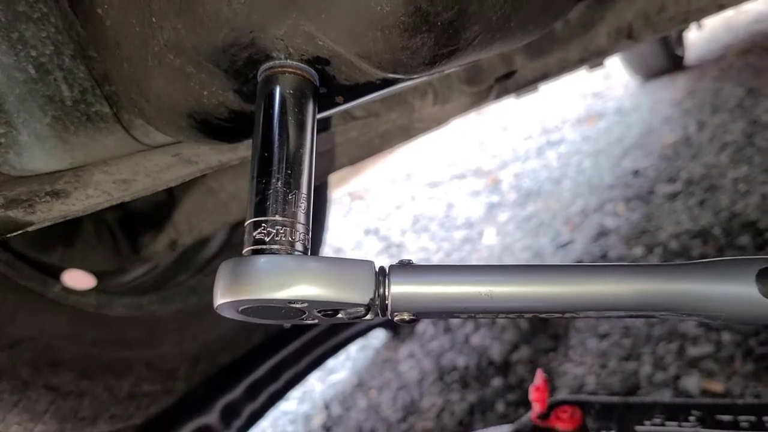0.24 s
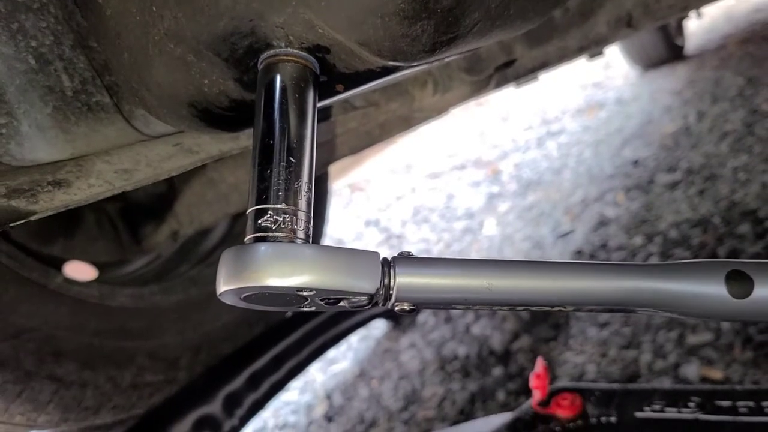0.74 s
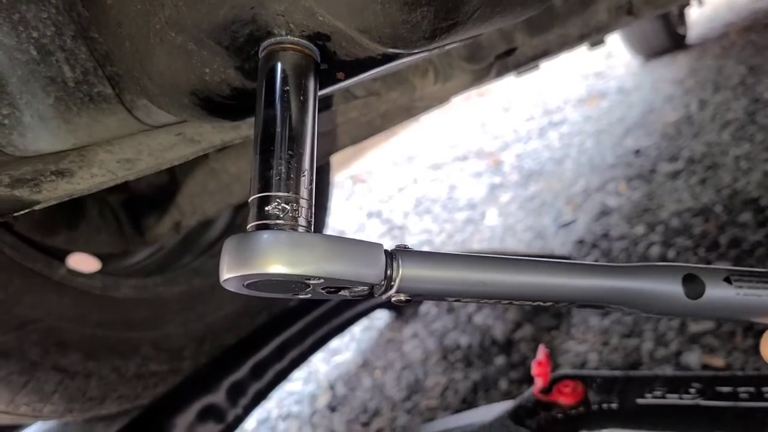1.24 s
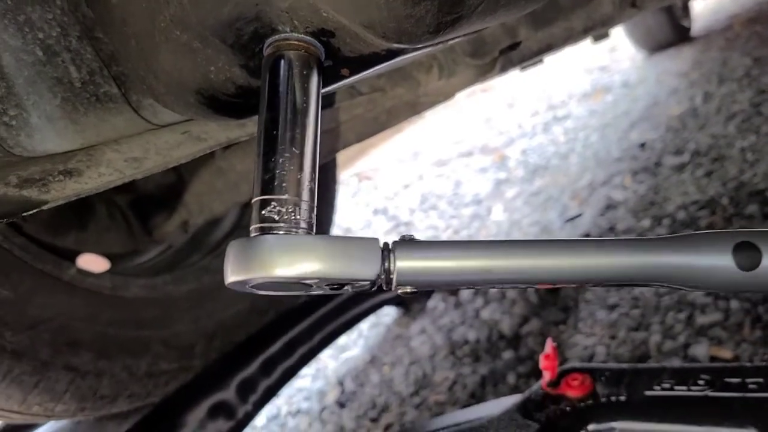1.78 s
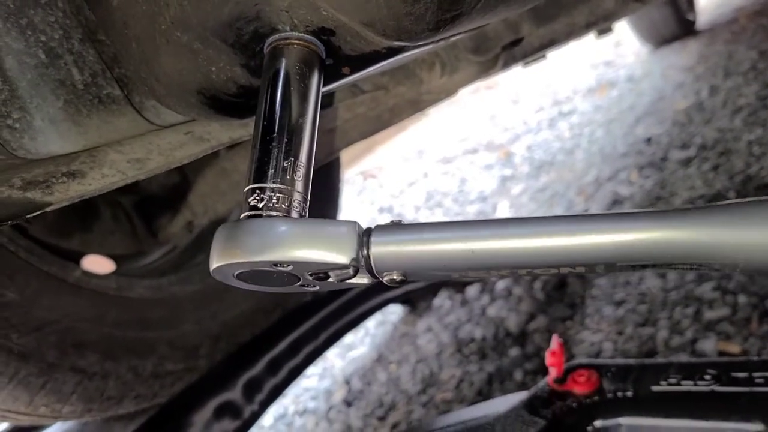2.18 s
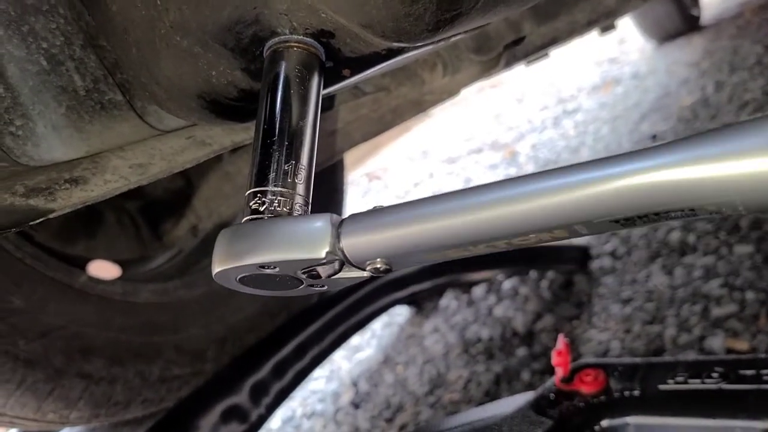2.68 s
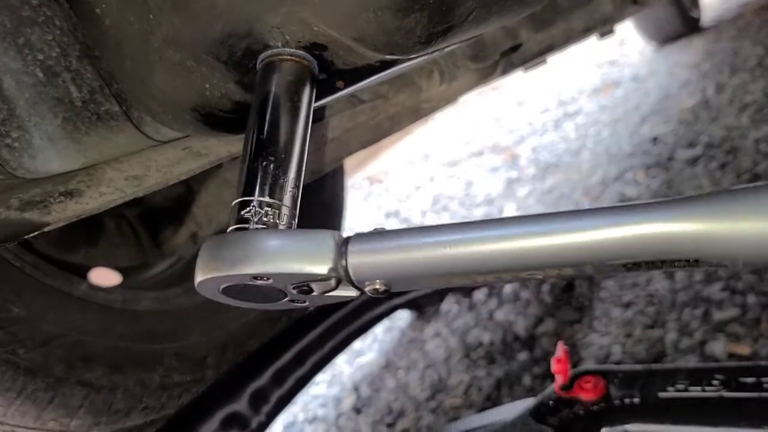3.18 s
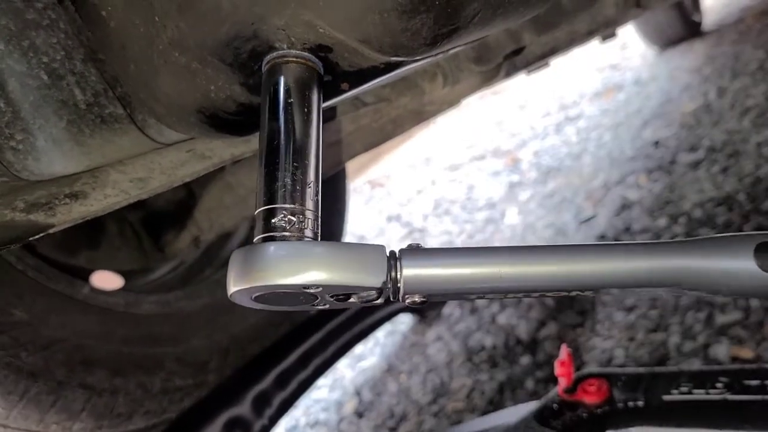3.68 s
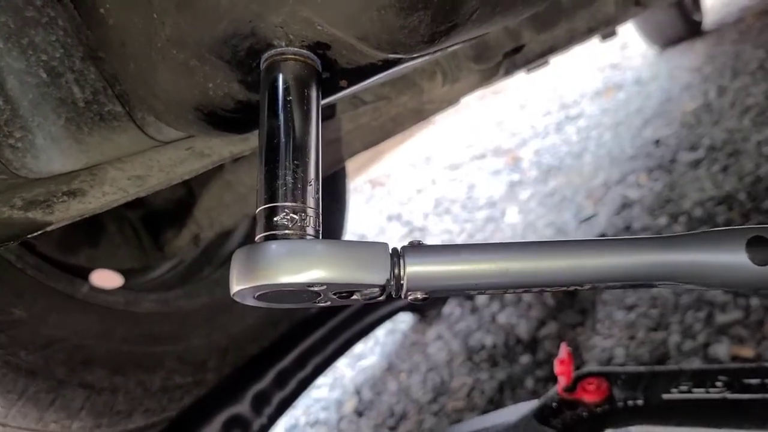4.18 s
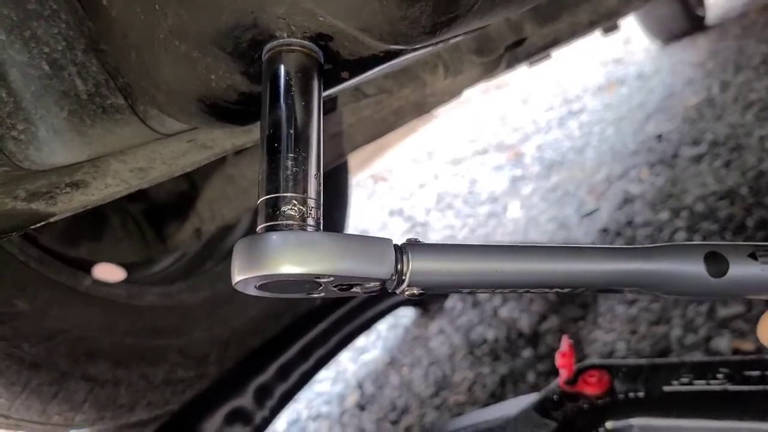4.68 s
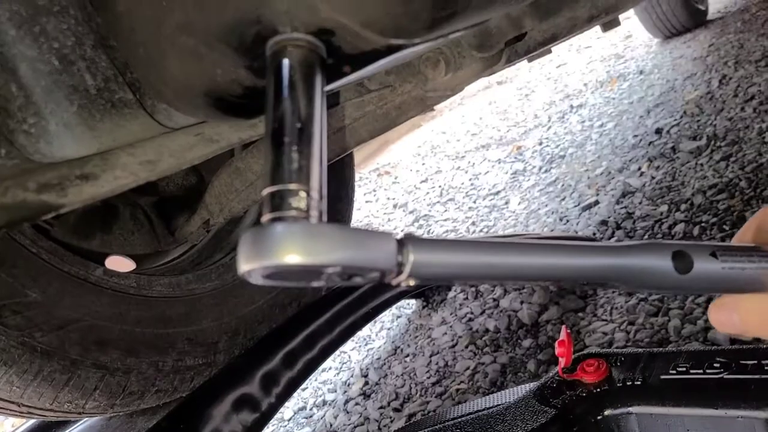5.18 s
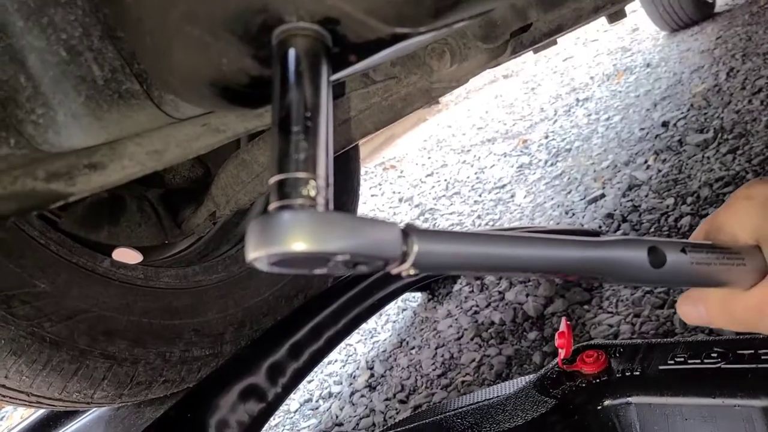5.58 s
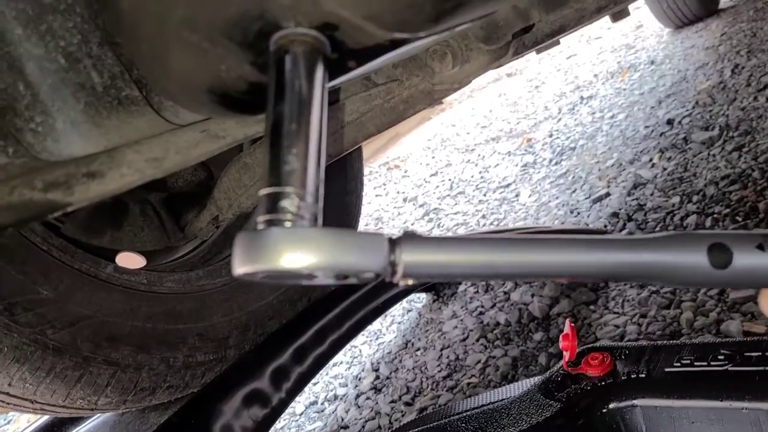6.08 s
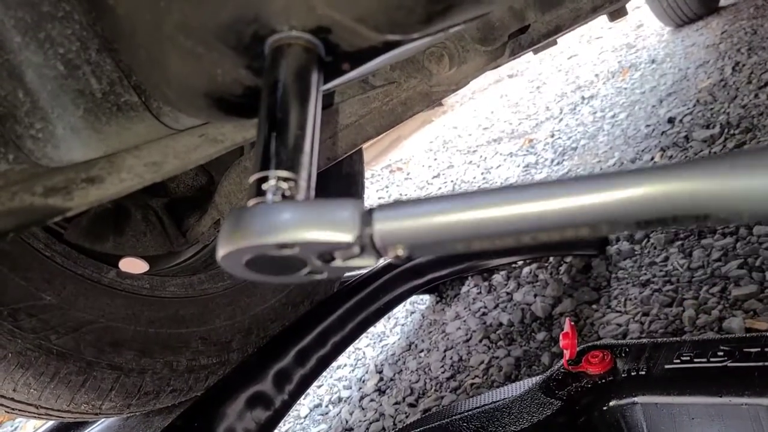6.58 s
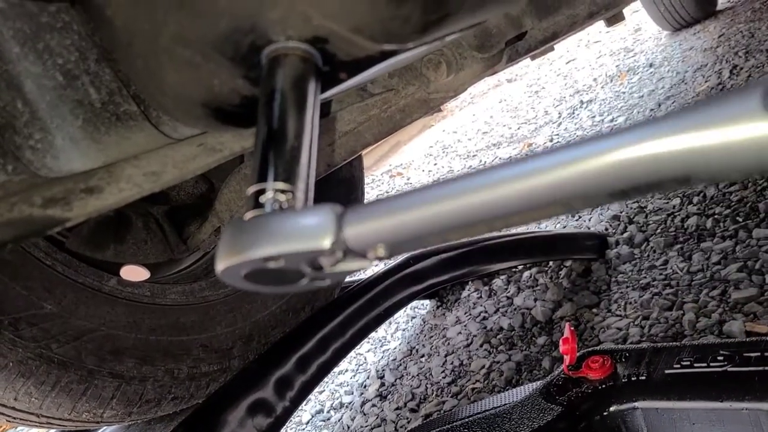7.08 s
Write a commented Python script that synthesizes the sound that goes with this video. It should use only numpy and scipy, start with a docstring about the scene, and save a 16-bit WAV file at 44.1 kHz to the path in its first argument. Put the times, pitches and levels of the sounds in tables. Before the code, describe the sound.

Under a car on gravel, closely miked in stereo, faint distant rumble and thin hiss run throughout with soft low wind puffs. From 0.1 to 0.6 s a mat gives small creaks at left; a sleeve swishes at right from about 0.6 to 1.3 s. Socket knocks, short and hollow with pan ring, come at 1.5 and 1.85 s amid more cloth. At 2.5 s the torque wrench cracks, by far the loudest event: a bright metallic snap with a tiny precursor and short ring. Faint knocks and ticks follow to 3.4 s. From 3.9 to 6.1 s sleeve rustle, mat creaks, rubbing and grit overlap, with a heavier drag near 5.4 s. A dull knock lands at 6.17 s, cloth fades, and a second, slightly softer snap strikes at 6.65 s. Weak clunks end around 7.3 s.

```python
"""Under a car on gravel a click-type torque wrench tightens a drain plug. It snaps twice at its set torque:
bursts of band-split noise crack while struck modes ring the tube and the oil pan. The socket knocks on the plug
and rings the pan. A sleeve swishes on the right and the mat creaks on the left, both friction noise. Noise bursts
through resonances give ticking grit and wind puffs; shaped noise gives distant rumble and faint outdoor hiss."""
import sys
import numpy as np
from scipy import signal
from scipy.fft import rfft, irfft, next_fast_len
from scipy.io import wavfile

SR = 44100
rng = np.random.default_rng(int(sys.argv[2]) if len(sys.argv) > 2 else 0)


def file_out(sig):
    """Save sig as 16-bit WAV at sys.argv[1]."""
    # one column per channel
    cols = np.atleast_2d(sig).T
    # limit, then scale
    lim = np.clip(cols, -1, 1)
    pcm = np.round(lim * 32767).astype(np.int16)
    wavfile.write(sys.argv[1], SR, pcm)


N = 323694
PORT_LAG = 21   # samples between the microphone ports for a source at the side


# Wrench pawl slipping and striking. Each row: start in seconds, crack level in dB, rise of the crack and decay
# of the blow in ms, blow into the pan over crack in dB, grip damping factor, tube ring over crack in dB.
PAWL_SNAPS = [(2.4800, -19, 1.8, -20, 2.5, -14), (2.5008, 0, 1.2, -23, 3.5, -9),
              (6.6303, -21, .6, -14, 1.2, -16), (6.6534, -14, 1.2, -24, 1.3, -20),
              (6.6562, -3, .9, -18, 1, -16)]
# Modes of wrench tube and socket. Each row: frequency in Hz, level in dB, t60 in seconds before the grip damps it.
WRENCH_MODES = [(1930, -14, .06), (2126, -20, .08), (3070, -18, .07), (4565, -12, .06), (4996, -12, .07),
                (5992, -16, .07), (8403, -22, .04), (9819, -16, .035), (10760, -17, .035),
                (12300, -16, .04), (14809, -26, .06), (2562, -32, .2), (2632, -32, .55), (3854, -23, .17),
                (4716, -19, .17), (5120, -25, .2), (5330, -26, .15), (5685, -18, .24), (5857, -27, .24)]
# Spectrum of the crack. Each row: frequency in Hz, level in dB per Hz.
CRACK_TONE = [(710, -35), (1200, -23.5), (1950, -5), (2400, -7.5), (4860, 3), (6800, 2), (7490, -7),
              (9110, -6.5), (12100, 7.5), (15500, 11), (16000, -14)]
LET_OFF_S, LET_OFF_T60_S = .16, .12   # this long after a snap the pull eases and the slack joint chokes the ring


def wrench():
    """Impulse excitation: each snap cracks, rings the tube and drives the pan; grip damps all but one long mode."""
    out = np.zeros((2, N))
    t = np.arange(20000) / SR
    choke = from_db(-60 * np.maximum(t - LET_OFF_S, 0) / LET_OFF_T60_S)
    for s, db, ms, pan_db, grip, ring_db in PAWL_SNAPS:
        # the socket's long ring escapes the grip
        held = [(hz, level_db, t60 / max(grip, .5) if t60 < .3 else t60)
                for hz, level_db, t60 in WRENCH_MODES]
        add(out, s, from_db(db) * crack(CRACK_TONE, ms, head_db=20.0, head_speed=6.1))

        tube_blow = contact(ms, 0.037, size=20000)
        tube = choke * struck(held, tube_blow, scatter_db=3.2)
        add(out, s, from_db(db + ring_db) * tube)

        pan_blow = contact(6, 2, size=12000)
        pan = struck(loaded_pan(0, load=.35), pan_blow, scatter_db=2)
        add(out, s, from_db(db + pan_db) * peak_one(pan))
    return out


# Socket knocking on the plug. Each row: start in seconds, peak of the first ring in dB, clunk over ring in dB,
# tilt of the ring in dB per octave.
SOCKET_KNOCKS = [(1.365, -50.5, -4, -16), (1.529, -26.5, -0.5, 7), (1.552, -30.5, -1.5, 6),
                 (1.847, -25, -3.5, 11), (1.877, -39, 0, 1), (2.879, -55.5, -2, 6.5), (3.278, -41, -3, -3),
                 (3.396, -44.5, 3, 3), (3.409, -48, 1, 4), (5.783, -38.5, -14, -5), (6.173, -28, 4.5, -10),
                 (6.239, -41, -17, 6), (6.577, -39.5, -14, 5.5), (6.949, -43.5, -11, -16),
                 (6.98, -50, -15, 8), (7.067, -35, 8, -14), (7.074, -36.5, -5, 22), (7.237, -53, -1.5, 2.5),
                 (7.289, -36.5, -8, -2)]
# Dense upper pan modes. Each row: frequency in Hz, level in dB per Hz.
CLUNK_TONE = [(350, -24), (600, -3), (1000, 16.5), (1500, -2.5), (2200, -18.5), (3000, 7.5), (4200, -16),
              (5200, -11), (8000, -55)]
KNOCK_MS = 4.0                       # decay of the contact chatter
REBOUND_S, REBOUND_DB = .011, -8.5   # spacing is near this; each rebound is weaker by this much


def socket():
    """Repeated impact: a knock and two uneven rebounds ring the low pan modes, with clunk from the dense upper ones."""
    out = np.zeros((2, N))
    for s, db, clunk_db, tilt_db in SOCKET_KNOCKS:
        for k in range(3):
            hit_s = s + k * REBOUND_S * rng.uniform(0.76, 1.2)
            hit_db = db + k * REBOUND_DB
            # soft, oily contact
            push = signal.lfilter([.2], [1, -.8], contact(KNOCK_MS, 1.1, size=12000))
            pan = struck(loaded_pan(tilt_db), push, scatter_db=2.5)
            add(out, hit_s, from_db(hit_db) * peak_one(pan))
            clunk = crack(CLUNK_TONE, KNOCK_MS / 2.3, head_db=23.0, head_speed=3.3)
            add(out, hit_s, from_db(hit_db + clunk_db) * clunk)
    return out


# Oil pan modes. Each row: frequency in Hz, level in dB before tilt, t60 in seconds with no socket on the plug.
PAN_MODES = [(586, -10, 0.47), (619, -13, 0.18), (700, -25, 0.17), (817, -5, 0.24), (896.6, -21.5, 0.1),
             (988, -1.5, 0.12), (1061.5, -2.5, 0.24), (1117, -3, 0.079), (1255, -6.5, 0.3),
             (1280, -23.5, 0.012), (1896, -3, 0.011)]


def loaded_pan(tilt_db, load=.6):
    """Modal damping: the pressed socket shortens the ring by the load; where the blow lands tilts the modes."""
    return [(hz, db + tilt_db * np.log2(hz / 900), load * t60) for hz, db, t60 in PAN_MODES]


# Decay of the crack by band. Each row: frequency in Hz, t60 in seconds.
CRACK_DECAY = [(500, 0.06), (1200, 0.19), (3500, 0.086), (9000, 0.076), (16000, 0.041)]
# Balance of the crack. Each row: frequency in Hz, left over right in dB.
CRACK_BALANCE = [(1000, 5.5), (2200, 2.5), (4500, 4.5), (8000, -7), (12000, -3)]


def crack(tone, rise_ms, head_db, head_speed, size=7000):
    """Diffuse decay: dense modes and echoes off floor pan and gravel as noise bands under a quick first fall."""
    edges, t = 400 * 2 ** np.arange(0, 5.4, 1 / 3), np.arange(size) / SR   # third octaves
    rise = (1 - np.exp(-1000 * t / max(rise_ms, .02))) ** 2
    out = 0
    for low, high in zip(edges, edges[1:]):
        hz = np.sqrt(low * high)
        fall = from_db(-60 * t / at_hz(CRACK_DECAY, hz))
        envelope = rise * (fall + from_db(head_db) * fall ** head_speed)
        noise = rng.standard_normal((2, size)) * envelope
        gain = from_db(at_hz(tone, hz) + at_hz(CRACK_BALANCE, hz) * np.array([[.5], [-.5]]))
        out = out + gain * bandpass(noise, low, high, order=2)
    return peak_one(out)


def struck(modes, push, scatter_db, turn=0.23):
    """Modal superposition: each port hears every mode at its own strength, one port a part of a cycle later."""
    out = 0
    gains = from_db(scatter_db * rng.standard_normal((len(modes), 2, 1)))
    for k, (hz, db, t60) in enumerate(modes):
        tone = from_db(db) * ring(push, hz, t60)
        late = np.r_[np.zeros(round(turn * SR / hz)), tone][:len(tone)]
        out = out + gains[k] * np.array([tone, late] if k % 2 else [late, tone])
    below_hz = .85 * min(modes)[0]      # a small body radiates little under its lowest mode
    return signal.sosfilt(signal.butter(4, below_hz, "high", fs=SR, output="sos"), out)


def contact(ms, chatter, size):
    """Impact force: a clean blow with chatter dying over about ms."""
    push = chatter * burst(ms, size=size)[0]
    push[0] += 1
    return push


# Sleeve strokes. Each row: start in seconds, rise in seconds, hold in seconds, fall in seconds,
# held hiss level in dB, body over hiss in dB.
SLEEVE_STROKES = [(0.547, .21, 0.54, 0.044, -52, 1.23), (1.463, 0.041, 0.097, 0.063, -57, 3),
                  (1.509, .16, 0.2, .12, -47, 0), (1.94, 0.061, .04, 0.13, -69, 2.66),
                  (2.99, 0.057, 0.2, 0.059, -65, 1.5), (3.33, 0.043, 0.27, .06, -72.5, 0.5),
                  (3.619, 0.046, 0.024, 0.11, -68.5, 2), (3.916, 0.32, 0.43, 0.15, -54.5, 2),
                  (4.703, 0.036, 0.018, 0.18, -59, 3.5), (4.835, 0.055, 0.26, 0.054, -61.5, 3.5),
                  (5.968, 0.12, .3, 0.35, -48.5, 1.34)]
# Spectrum of the cloth. Each row: frequency in Hz, level in dB per Hz.
CLOTH_TONE = [(200, -7.5), (330, 0), (460, -7.5), (720, 1), (1400, -3), (2000, -5), (2500, -6),
              (3300, -4.5), (4200, -7), (6400, 7), (7900, -20), (9500, -17.5), (12000, -17), (16000, -31.5)]
# Balance of the cloth. Each row: frequency in Hz, left over right in dB.
CLOTH_BALANCE = [(250, -1.5), (1300, -1), (2400, -3.5), (5000, -1.5), (9000, -10.5), (16000, -11.5)]


def sleeve():
    """Sliding friction: smooth cloth noise from the right in strokes; broad contact adds body below the hiss."""
    alike = [(250, 0.7), (1000, 0.29), (3000, 0.05), (8000, 0.054), (16000, 0.13)]
    grains = friction(1.5, 30000)
    rub = stereo_noise(grains, CLOTH_TONE, CLOTH_BALANCE, alike, PORT_LAG, patchy_db=1.8)
    hiss, body = part(rub, 7500, 18000), part(rub, 150, 7500)
    body = body + from_db(-22.0) * part(rub, 1900., 2150.)      # the weave sings faintly
    return sum(stroke(*shape) * (hiss + from_db(body_db) * body) for *shape, body_db in SLEEVE_STROKES)


# Mat creaks. Each row: start in seconds, level in dB before the port gains, slip decay in ms,
# bright edge over resonance in dB.
MAT_CREAKS = [(0.083, -44, 7.5, -20), (0.274, -58, 7.8, -20), (0.33, -54, 3.1, -21),
              (0.471, -48.5, 14, -13), (0.591, -43, 4.2, -8), (0.602, -34.5, 6.7, -16.5),
              (1.411, -43, 37, -16), (3.943, -50, 3.1, -15), (4.15, -42.5, 12, -12), (4.32, -42.5, 10, 0.5),
              (4.52, -36, 5.3, -3), (5.197, -41, 19, -6.5), (5.331, -53, 5.7, 4), (5.982, -38, 3.4, -5),
              (5.994, -40.5, 11, -11), (6.396, -48, 7.8, 1)]


def creaks():
    """Stick-slip: short slips excite the mat's resonances with a bright edge, reaching the left port first."""
    out = np.zeros((2, N))
    for s, db, ms, bright_db in MAT_CREAKS:
        slip = burst(ms, size=3000)
        slip = slip[0] + 3.2 * slip      # partly alike at both ports
        edge = bandpass(slip, 900., 7000., order=1)
        sound = peak_one(mat_voice(slip)) + from_db(bright_db) * peak_one(edge)
        left = from_db(5.0) * sound[0]
        right = from_db(3.5) * np.roll(sound[1], PORT_LAG)
        add(out, s, from_db(db) * np.array([left, right]))
    return out


# Mat resonances. Each row: frequency in Hz, width in Hz, level in dB.
MAT_MODES = [(497.6, 820, -6), (812.5, 62, 1), (1278, 87, 0.5), (2050, 700, -15.5)]


def mat_voice(x):
    """Parallel resonance: the mat's modes add with alternating signs, broader ones dying sooner."""
    out = 0
    for k, (hz, width, db) in enumerate(MAT_MODES):
        t60 = np.log(1000) / np.pi / width
        out = out + (-1) ** k * from_db(db) * width * ring(x, hz, t60)
    return out


# Weight shifting on the mat. Each row: time in seconds, level in dB, scratch over level in dB.
WEIGHT_SHIFTS = [(3.84, -75, -14), (3.93, -63.5, -14), (4.05, -60, -10), (4.18, -54.5, -7.5),
                 (4.34, -49.5, -9), (4.5, -54.5, -6), (4.64, -57.5, -6), (4.79, -57, -7), (4.85, -64.5, -6),
                 (4.95, -56.5, -11.5), (5.14, -57, -9), (5.35, -47, -6.5), (5.5, -47, -1),
                 (5.63, -41.5, -2.4), (5.71, -56, -6), (5.9, -57.5, -9.5), (5.99, -45, -6),
                 (6.03, -54.5, -14), (6.1, -64, 9)]
# Spectrum of the rubbing. Each row: frequency in Hz, level in dB per Hz.
RUBBING_TONE = [(90, -19.5), (150, -4), (300, -9), (480, -7), (800, 2), (1340, -1), (2020, -7),
                (3200, -9.5), (5200, -18.5), (6700, -9.5), (8200, -22), (12000, -20), (16000, -18)]
# Balance of the rubbing. Each row: frequency in Hz, left over right in dB.
RUBBING_BALANCE = [(150, -0.5), (400, -2.5), (800, 5.5), (2400, 9), (8000, 7.5), (16000, 2)]
# A heavy drag across the ground. The one row: start in seconds, rise in seconds, hold in seconds,
# fall in seconds, held level in dB.
GROUND_DRAG = (5.41, .025, .045, .09, -45)


def shifting():
    """Granular friction: rubbing from the left, its middle range exciting the mat, with one heavy drag."""
    level_db, scratch_db = between_silence(WEIGHT_SHIFTS)
    alike = [(150, 0.11), (500, 0.7), (1500, 0.61), (6000, 0.07), (16000, 0.034)]
    grains = friction(0.43, 11000)
    rub = stereo_noise(grains, RUBBING_TONE, RUBBING_BALANCE, alike, -PORT_LAG, patchy_db=0.77)
    slips = from_db(3.6 * drift(25.0) - 2.0)      # the mat gives way in uneven slips
    middle = from_db(-6.0) * part(rub, 650, 1800) + slips * rms_one(mat_voice(rub))
    scratch, weight = part(rub, 2500, 18000), part(rub, 100, 600)
    mixture = middle + from_db(scratch_db) * scratch + from_db(-9.0) * weight
    drag = stroke(*GROUND_DRAG) * from_db(1.7 * drift(43.0)) * weight
    return from_db(level_db) * mixture + drag


# Grit ticks. Each row: start in seconds, level in dB, resonance in Hz, left over right in dB, burst decay in ms.
GRIT_TICKS = [(.757, -45, 5400, 3, 4), (1.835, -34.5, 5670, -7, 3.5), (2.983, -39.5, 610, -6, 11.4),
              (3.132, -50.5, 1550, -13, 6.6), (3.38, -42, 360, -3, 7.4), (3.394, -58, 9000, -6, 3),
              (4.518, -37, 7130, 18, 4.4), (4.901, -52, 672, -14, 5), (4.916, -44, 624, -8, 20),
              (5.079, -41, 640, -5.5, 6.9), (5.135, -39, 880, -9, 7.2), (5.137, -47, 10700, -15, 2.1),
              (5.724, -35.5, 7770, 12, 4.1), (5.776, -42, 14100, 11, 3), (7.034, -58, 12100, -14, 2.8)]


def grit():
    """Resonant impact: each tick is a short noise burst through one resonance."""
    return blips(GRIT_TICKS, cycles=5.3, alike=0.16)


# Outdoor rumble. Each row: time in seconds, level in dB.
RUMBLE_LEVEL = [(0.0, -56.5), (0.31, -55), (0.8, -52), (1.7, -51), (2.5, -54.5), (3.4, -55), (4.7, -51),
                (5.85, -51.5), (6.58, -55.5), (7.03, -55), (7.34, -57)]
# Spectrum of the rumble. Each row: frequency in Hz, level in dB per Hz.
FAR_TONE = [(8.8, -36.5), (15, -14.5), (70, 1.5), (83, -2.5), (103, -9.5), (150, -14), (210, -21.5),
            (270, -29), (308, -50.5), (500, -25), (650, -66.5), (1100, -120)]
# Spectrum of the hiss. Each row: frequency in Hz, level in dB per Hz.
HISS_TONE = [(120, -28.5), (200, -3.5), (500, -14.5), (659, -12.5), (836, -17.5), (1020, -17), (1250, -20),
             (1400, -19.5), (1740, -20.5), (2860, -26), (3020, -25), (5730, -30.5), (6520, -20),
             (7970, -43.5), (16000, -32)]
# Wind puffs on the microphone. Each row: start in seconds, level in dB, left over right in dB, burst decay in ms.
WIND_PUFFS = [(0.885, -37.5, -18, 28), (1.395, -36.5, 5, 83), (1.685, -44, -37, 22),
              (2.296, -45.5, -27, 40), (2.625, -38, -16, 124), (2.934, -43, -18, 28), (3.984, -40, -10, 50),
              (5.353, -42, -2, 58), (6.322, -50, -3, 22), (6.786, -44, -19, 130)]
HISS_DB, PUFF_HZ = -66, 68


def outdoors():
    """Spectral shaping: noise forms far rumble, its bass stronger on the right, and thin hiss; wind puffs on top."""
    rumble = stereo_noise(rng.standard_normal((3, N)), FAR_TONE,
                          side=[(25, -11.0), (60, -3.0), (130, -2.5), (400, 1.5)],
                          alike=[(25, 0.45), (60, 0.76), (130, 1.0), (300, 0.67), (500, 0.2)],
                          lag=3.0, patchy_db=0.0, count=4)
    hiss = stereo_noise(rng.standard_normal((3, N)), HISS_TONE,
                        side=[(200, -0.87), (16000, .1)],
                        alike=[(200, 0.3), (600, 0.21), (2000, .05)],
                        lag=6.0, patchy_db=0.33, count=8)
    puffs = [(s, db, PUFF_HZ, side_db, ms) for s, db, side_db, ms in WIND_PUFFS]
    level_db = in_time(RUMBLE_LEVEL)[0]
    return from_db(level_db) * rumble + from_db(HISS_DB) * hiss + blips(puffs, cycles=3.9, alike=0.53)


def blips(rows, cycles, alike):
    """Filtered excitation: short noise bursts pass through one broad resonance each, damped in two stages."""
    out = np.zeros((2, N))
    for s, db, hz, side_db, ms in rows:
        push = burst(ms, size=9000)
        push = alike * push[0] + push
        sound = peak_one(ring(ring(push, hz, cycles / hz), hz, 0.27 / hz))
        add(out, s, from_db(db + 1.0 + side_db * np.array([[.5], [-.5]])) * sound)
    return out


def stereo_noise(streams, tone, side, alike, lag, patchy_db, count=10):
    """Coherence between ports: coloured noise from one direction, octaves flickering partly on their own."""
    size = next_fast_len(N, True)
    hz = np.arange(size // 2 + 1) * SR / size
    both, left, right = rfft(streams, size)
    share = np.clip(at_hz(alike, hz), 0, 1)         # part of the power that the ports have in common
    turn = np.exp(-1j * np.pi * hz * lag / SR)      # half the lag on either port; above 0 the right leads
    pair = np.sqrt(share) * both * [turn, turn.conj()] + np.sqrt(1 - share) * np.array([left, right])
    pair = pair * from_db(at_hz(tone, hz) + at_hz(side, hz) * np.array([[.5], [-.5]]))
    out, together = 0, drift(15.0)
    octave = np.clip(np.log2(hz / 30 + 1e-9), 0, count - 1)
    for k in range(count):
        band = irfft(pair * np.clip(1 - np.abs(octave - k), 0, 1), size)[:, :N]
        out = out + band * from_db(patchy_db * (0.91 * together + drift(2.9)))
    return mid_rms_one(out)


def friction(grain_db, per_s):
    """Shot noise: three streams of uneven grains, one that both ports hear and one for each alone."""
    sizes = from_db(grain_db * np.minimum(rng.exponential(1, (3, N)), 5))
    return rng.standard_normal((3, N)) * sizes * (rng.random((3, N)) < per_s / SR)


def burst(ms, size=9000):
    """Exponential decay: two draws of contact noise dying over about ms, unit energy."""
    x = rng.standard_normal((2, size)) * np.exp(-np.arange(size) / (max(ms, .05) * SR / 1000))
    return x / np.sqrt(np.sum(x ** 2, axis=1, keepdims=True)) + 1e-18


def ring(x, hz, t60):
    """Damped oscillator: a unit click sets a sine of height 1 ringing."""
    r, w = from_db(-60 / (max(t60, 1e-3) * SR)), 2 * np.pi * hz / SR
    return signal.lfilter([0, np.sin(w)], [1, -2 * r * np.cos(w), r * r], x)


def drift(rate_hz):
    """Low-passed chance: a slow random wander about 0 with rms 1, drawn once every 40 samples."""
    r = np.exp(-80 * np.pi * rate_hz / SR)
    slow = signal.lfilter([1], [1, -2 * r, r * r], rng.standard_normal(N // 40 + 2002))[2000:]
    return np.interp(np.arange(N) / 40, np.arange(len(slow)), rms_one(slow))


def stroke(s, rise_s, hold_s, fall_s, db):
    """Amplitude envelope: one movement swells, holds and dies away between silences."""
    times = s + np.cumsum(np.abs([0, rise_s, hold_s, fall_s]))
    levels = db - 22 * np.array([1, 0, 0, 1])      # starts and ends 22 dB under its full level
    return from_db(between_silence(list(zip(times, levels)))[0])


def between_silence(rows):
    """Level contour: curve columns, the first a level in dB that fades to -120 dB at both ends."""
    first, last = list(rows[0]), list(rows[-1])
    before = [first[0] - .04, -120] + first[2:]
    after = [last[0] + .04, -120] + last[2:]
    return in_time([before] + list(rows) + [after])


def in_time(rows):
    """Linear interpolation: curve columns at every sample."""
    s, *columns = np.transpose(rows)
    return [np.interp(np.arange(N) / SR, s, c) for c in columns]


def at_hz(points, hz):
    """Logarithmic pitch scale: read a table on a log-frequency axis."""
    return np.interp(np.log(hz + 1e-9), np.log(np.array(points)[:, 0]), np.array(points)[:, 1])


def bandpass(x, low_hz, high_hz, order):
    """Band limiting: a Butterworth band."""
    return signal.sosfilt(signal.butter(order, [low_hz, high_hz], "band", fs=SR, output="sos"), x)


def part(x, low_hz, high_hz):
    """Band decomposition: one band of a sound, rms 1 in the mean of both ports."""
    return mid_rms_one(bandpass(x, low_hz, high_hz, order=2))


def mid_rms_one(x):
    """Power normalisation: rms 1 in the mean of both ports."""
    return x / np.sqrt(np.mean(x.mean(axis=0) ** 2))


def rms_one(x):
    """Power normalisation: unit rms."""
    return x / np.sqrt(np.mean(x ** 2) + 1e-20)


def peak_one(x):
    """Peak normalisation: unit peak."""
    return x / np.max(np.abs(x))


def from_db(db):
    """Decibel law: amplitude gain of a level in dB."""
    return 10 ** (np.asarray(db) / 20)


def add(out, s, piece):
    """Superposition: mix a stereo piece in at time s."""
    i = round(s * SR)
    out[:, i:i + piece.shape[1]] += piece[:, :N - i]


def scene():
    """Superposition: all sources add at the two microphone ports."""
    return wrench() + socket() + creaks() + grit() + sleeve() + shifting() + outdoors()


def record(dry):
    """Low-pass filtering: the top is cut, 60 dB down from 16 kHz."""
    return signal.sosfilt(signal.cheby2(16, 60, 16000, fs=SR, output="sos"), dry)


dry = scene()
out = record(dry)
file_out(out)
```